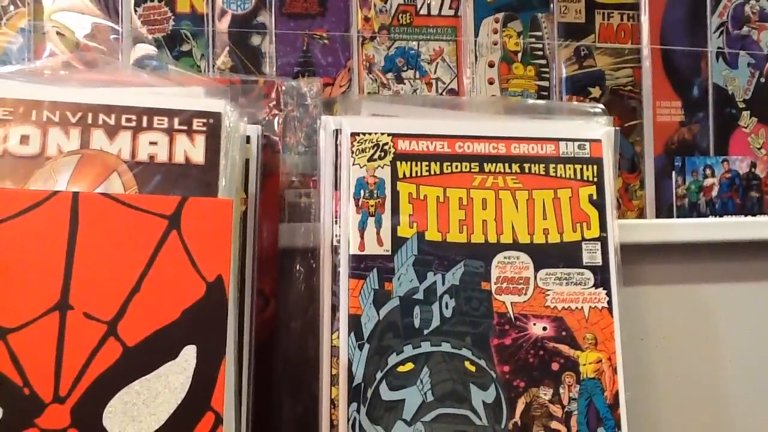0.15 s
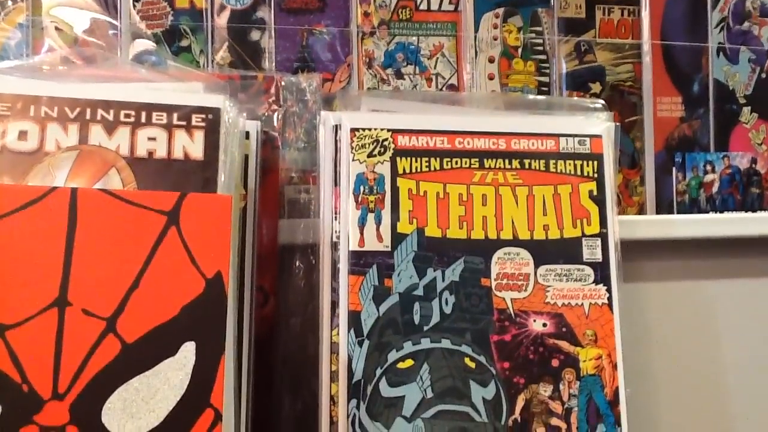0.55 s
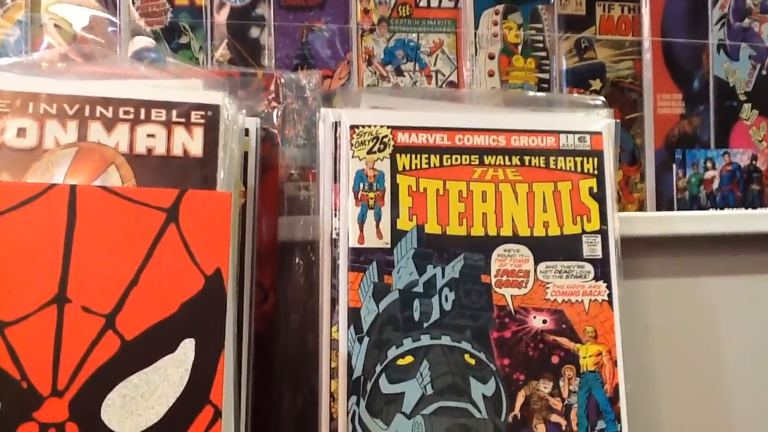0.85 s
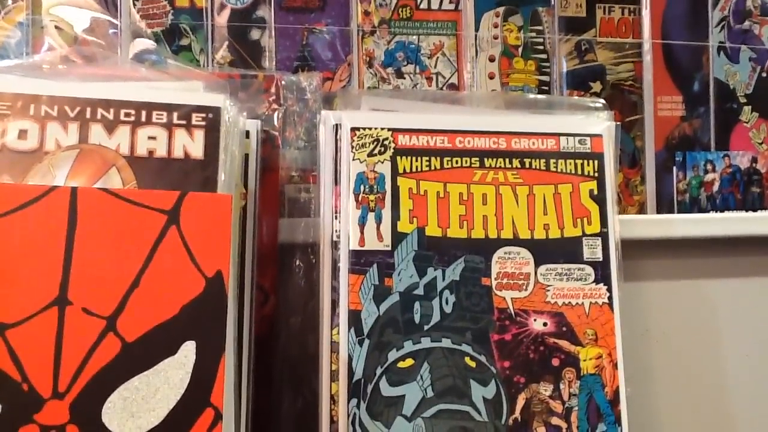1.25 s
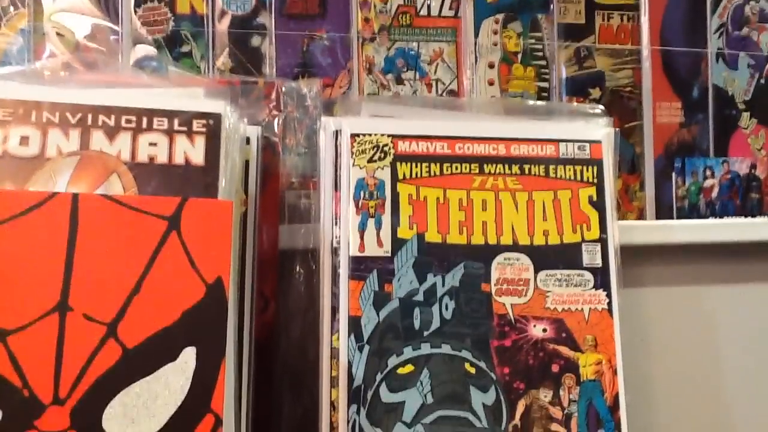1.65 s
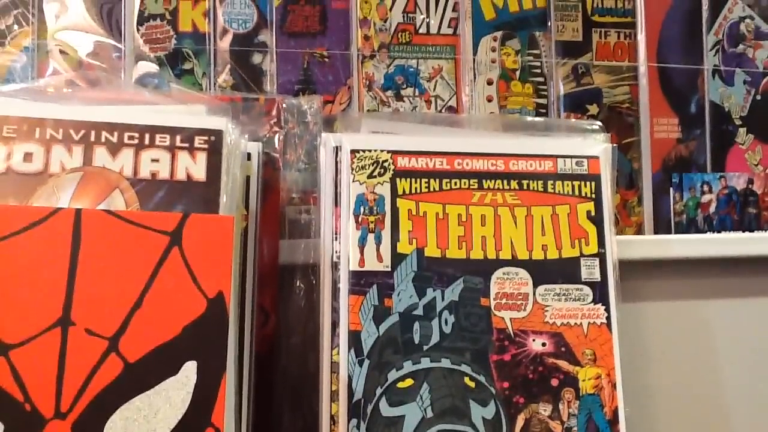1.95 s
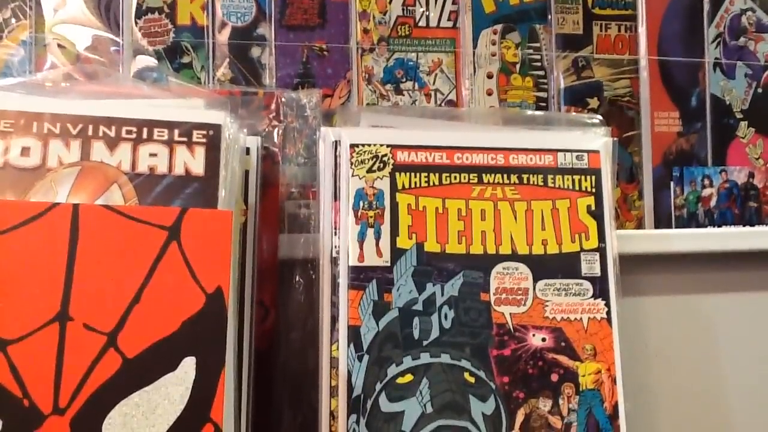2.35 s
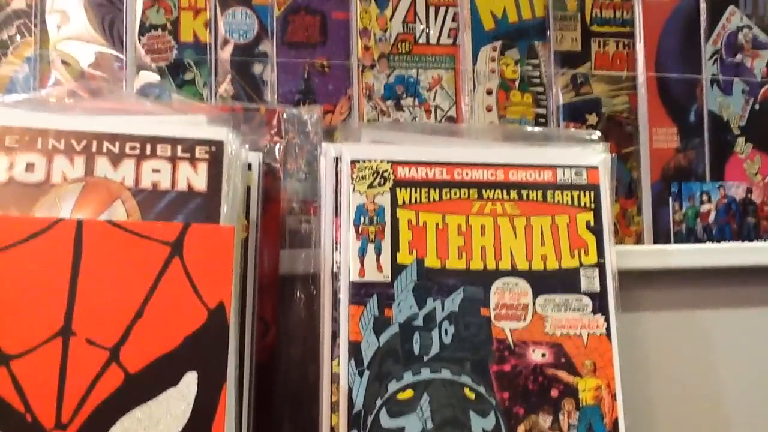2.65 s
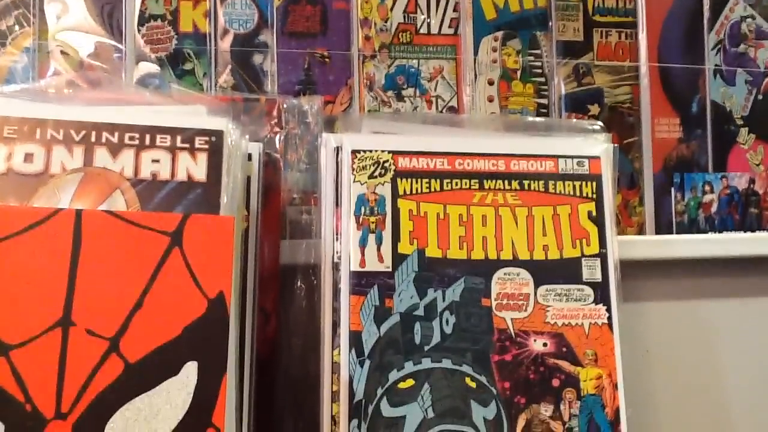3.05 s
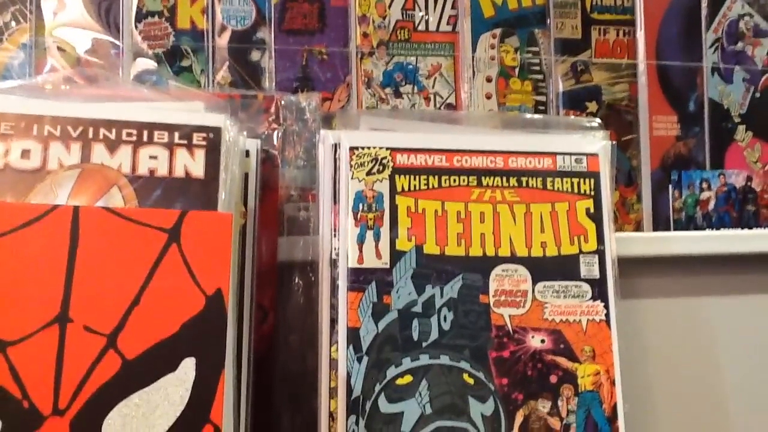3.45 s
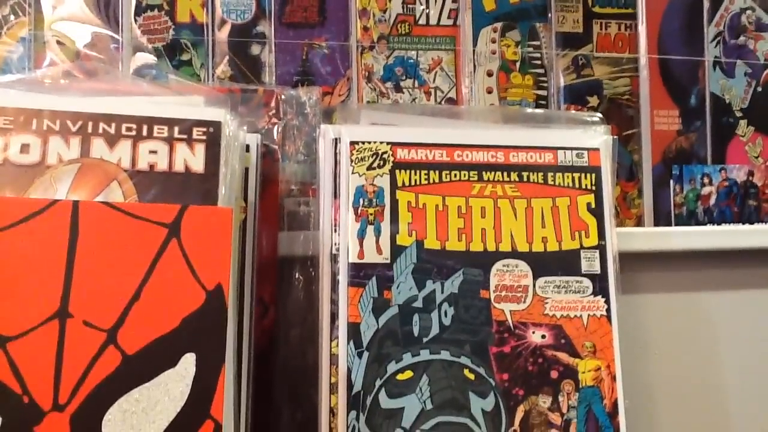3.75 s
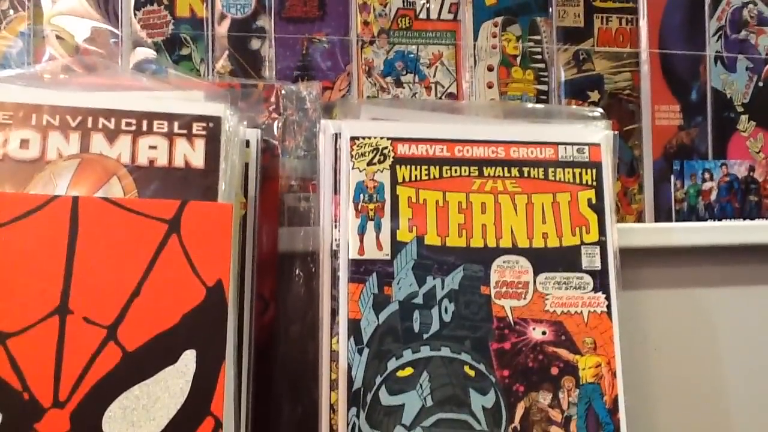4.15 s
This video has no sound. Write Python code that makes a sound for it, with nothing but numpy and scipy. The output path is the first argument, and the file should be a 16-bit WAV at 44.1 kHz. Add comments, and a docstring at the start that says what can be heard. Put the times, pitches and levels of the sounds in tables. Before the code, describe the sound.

A close, dry mono recording in a small quiet room. A faint low appliance hum, slightly wavering, and soft room hiss run throughout. Quiet rustle opens, then from about 0.25 s stiff plastic film crackles sharply. Tape lets go in bright, hard snaps near 0.55 to 0.6, 0.7 and 0.85 s, with the loudest tight cluster at 1.0 s and a low hand bump. The recording level ducks after it, hum included, and slowly recovers. Lighter crinkles follow, with a crisp burst around 1.45 s and softer swishes to 1.9 s. From 2.0 to 3.0 s there are only sparse small ticks and thin rustles, one clearer at 2.4 s. Crackling picks up from 3.05 s, with rapid little card knocks and dull scraping around 3.2 s and strong snaps near 3.3 and 3.4 s. More snaps and soft bumps come near 3.95 s, then a dense crackle at 4.15 s as a very faint low tone swells until the end.

```python
"""Peeling a taped plastic sleeve

Hands peel the taped flap of a stiff plastic sleeve close to a small microphone in a quiet room.
Buckling creases and the yielding tape snap as short noise bursts, each ringing a patch of film.
The film rustles (clumped crackles over hiss) and the card scrapes (dull noise) in swells; hands and desk
give low pushes, the card higher knocks. An appliance hums as two wavering tones over room tone, and a
faint low tone swells late. The recorder's gain control ducks after the loudest snaps and slowly recovers."""
import sys
import numpy as np
from scipy import signal
from scipy.fft import rfft, irfft
from scipy.io import wavfile
from scipy.ndimage import uniform_filter1d

SR = 44100
rng = np.random.default_rng(int(sys.argv[2]) if len(sys.argv) > 2 else 0)


def nominal_scale(level):
    """Amplitude ratio for a level in decibels (scalar or array-like)."""
    x = np.asarray(level, float) / 20
    return 10 ** x


def transcribe(u):
    """Save the signal u as a 16-bit wav file named by the first command-line argument.

    u: samples, shape (n,) or (channels, n), limited to [-1, 1]; the rate is SR.
    q: integer samples, one column per channel.
    """
    v = np.clip(np.atleast_2d(u).T, -1, 1)
    q = np.round(v * 32767).astype(np.int16)
    wavfile.write(sys.argv[1], SR, q)


N = 189100

# Creases buckling. Each row: time in seconds, nominal level of the body band over one ms in dB,
# ring frequency in Hz, bass share in dB, treble share in dB (shares relative to the body band).
CREASE_SNAPS = [(.0578, -52.5, 1840, 5, -4), (.2408, -47, 8960, -3, 5), (.2611, -25.5, 3370, -6.5, -8),
                (.2647, -29.5, 5950, -5.5, -3.5), (.3256, -41, 2670, 2, 2), (.3403, -32, 4200, -3.5, -5),
                (.3411, -30.5, 4460, -13, -7), (.3669, -40, 5460, -25, 8), (.3905, -48, 3750, -15, -16),
                (.4013, -27.5, 3480, -10, -13), (.4062, -32, 2380, -10, -4), (.408, -33.5, 5860, -4.5, -5),
                (.4691, -39.5, 10000, -24, 11), (.474, -33.5, 2470, -5.5, -3), (.489, -33, 3400, -16, -5),
                (.5344, -39, 5040, -2, -5), (.5419, -32, 4690, -24, -7), (.5605, -37, 2840, 0.5, -3),
                (.5824, -41, 4480, 1, 11), (.614, -42, 5040, -15, 16), (.659, -32.5, 2370, -5, -8),
                (.7154, -38.5, 3040, -7, -20), (.7247, -28, 6330, -2.5, 9), (.732, -34, 4520, -19, -7),
                (.7566, -35, 2540, -6, -25), (.7798, -34.5, 4240, -32, -13), (.8356, -33.5, 3730, -12, -4),
                (.8434, -37, 3230, 2, -13), (.861, -38, 9000, 2, 15), (.9666, -43.5, 2710, 1.5, -22),
                (1.0728, -47, 5600, -15.5, -4), (1.14, -31.5, 3480, -32.5, -15), (1.19, -49, 3330, -3.5, 4),
                (1.2086, -46.5, 6430, -2, -2), (1.2284, -42.5, 4970, -16, -14), (1.2663, -52, 2400, 4, -8),
                (1.364, -39.5, 3360, -2.5, -16), (1.4172, -34.5, 3860, -21, -10),
                (1.4197, -40, 5070, -15, -3), (1.429, -35, 2760, -4, 5), (1.4512, -25, 7550, -37, 3),
                (1.4577, -36, 2700, -4.5, -11), (1.4663, -27.5, 3620, -34, -23),
                (1.7889, -43.5, 2580, -15, -11), (1.8305, -45, 6460, -19, -7),
                (1.8527, -42.5, 5850, -28, -7), (1.8778, -47, 4180, -12, 0), (1.9052, -39.5, 4730, -15, 1),
                (2.0127, -50.5, 5560, -3.5, 1), (2.2082, -52.5, 2940, -12, -16),
                (2.2819, -48.5, 4780, -22, -8), (2.3031, -49.5, 4220, -16, -7),
                (2.3343, -48, 4570, -23, -6), (2.371, -44, 3550, -27, -5), (2.3726, -42.5, 4560, -21, -10),
                (2.4023, -32.5, 8040, -12, 0), (2.4045, -47, 6400, -3, -16), (2.428, -43, 4760, -19, -2),
                (2.477, -48.5, 6850, -10, 0), (2.4804, -42, 3380, -10, -7), (2.528, -45, 2800, -19, -12),
                (2.6101, -58, 4450, -20, 1), (2.6562, -50.5, 3280, -18, -5),
                (2.7377, -45.5, 5170, -11, -1.5), (2.7442, -48.5, 6850, -10, -11),
                (2.828, -48.5, 3100, -1.5, -11.5), (2.9658, -50.5, 4740, -16, -2.5),
                (3.0393, -44, 4670, -2, -10), (3.0508, -35, 6640, -27, -3.5), (3.0706, -39, 6200, -11, 1),
                (3.0983, -29, 4340, -15, -5.5), (3.1167, -38, 3830, -22, 3), (3.155, -28, 4120, -5, -1.5),
                (3.1576, -40, 7060, -6, 4), (3.1715, -40.5, 3760, -5, -20), (3.223, -48.5, 2670, 11, -2),
                (3.2539, -46, 3190, -9, 5), (3.3058, -25, 6200, -10, -3), (3.3228, -41, 5300, -9, -14),
                (3.3431, -55, 2710, 9.5, -12), (3.3691, -46, 7880, -2, 5), (3.3898, -48, 2670, -19, 3),
                (3.4105, -28.5, 2380, -8.5, -21), (3.412, -36, 6300, -13, 10),
                (3.4229, -39, 2970, -22, -19), (3.4421, -35.5, 7400, -8, 4), (3.458, -42, 7580, -1, 1.5),
                (3.4786, -32, 3800, -19, -29), (3.4843, -43.5, 4350, 0, -7),
                (3.5107, -32.5, 4540, -10.5, -9), (3.5628, -55, 1810, 6, 2), (3.661, -40.5, 4200, -8, -2),
                (3.695, -44, 2970, -3, -14), (3.7798, -39.5, 5250, -14, 1.5), (3.861, -31.5, 3100, 0.5, -8),
                (3.8669, -30.5, 7100, -30, 3), (3.9454, -44, 8700, -6, 1), (3.9628, -27, 3300, -11, 1.5),
                (3.967, -30.5, 3000, -7, -6.5), (3.998, -42, 5170, -6, 4), (4.023, -35.5, 6850, -21, 1.5),
                (4.0253, -33, 5330, -13, -2), (4.0526, -44, 5210, -18, 8.5), (4.0806, -38.5, 4660, -7, -14),
                (4.1345, -32, 6500, -11, 6.5), (4.1414, -47, 8960, -18, 12), (4.1466, -27, 5130, -17, -1.5),
                (4.1493, -27.5, 2900, -7.5, -5), (4.1543, -31.5, 5680, -1, 2), (4.1571, -35, 6120, -19, -8),
                (4.1675, -38, 7020, -16, -10), (4.1753, -34, 6030, -8, 3), (4.1795, -36.5, 2520, -8, -12),
                (4.185, -44, 4260, -8, -11), (4.2102, -39.5, 4910, -13, 0), (4.233, -40.5, 4570, -15, 1),
                (4.2394, -38, 3700, -20, -16), (4.2427, -37, 5900, -11, -2)]
# The tape letting go in jerks. Each row: the same columns as the crease snaps.
TAPE_JERKS = [(.557, -19.5, 5040, -24, -3), (.5793, -13.5, 4300, -18, -7), (.6084, -13, 5100, -17, -2),
              (.7205, -13.5, 5700, -18, 1), (.8514, -24, 8660, -9, 0), (.8535, -11, 3100, -9, 3),
              (.9962, -4, 3400, -16, -6), (.9978, -4.5, 4400, -17, -5), (1.0017, -22, 8100, -12, 4),
              (1.0032, -5, 3320, -25, -8)]
# Soft bumps and knocks: low pushes of hands and desk, higher knocks of the card. Each row:
# start in seconds, peak before the high-pass in dB, pitch in Hz, nominal t60 in seconds.
BUMPS_AND_KNOCKS = [(0.26, -35.5, 306, 0.063), (0.314, -33.5, 380, 0.0075), (0.403, -36.5, 497, 0.035),
                    (0.472, -34.5, 730, 0.0094), (0.575, -37, 256, 0.0081), (0.617, -48, 262, 0.027),
                    (0.718, -31, 580, 0.01), (0.852, -31, 350, 0.037), (0.998, -25, 383, 0.037),
                    (1.017, -23, 256, 0.074), (1.211, -32, 279, 0.058), (1.376, -40.0, 336, 0.016),
                    (1.459, -38, 221.0, 0.019), (1.805, -33.5, 245, 0.012), (1.889, -36.5, 340, 0.078),
                    (1.926, -38, 368, 0.038), (2.311, -39.5, 273, 0.019), (3.047, -48, 284, 0.039),
                    (3.154, -35, 587.0, 0.017), (3.17, -45, 905, 0.03), (3.185, -41, 1040, 0.032),
                    (3.205, -48, 950, 0.03), (3.222, -37, 1050, 0.045), (3.233, -39, 960, 0.035),
                    (3.242, -40.5, 1000, 0.026), (3.8, -40, 266, 0.0071), (3.886, -38, 390, 0.026),
                    (3.975, -40, 390, 0.042), (4.007, -30, 284, 0.024), (4.048, -31, 293, 0.018),
                    (4.073, -36, 284, 0.036), (4.104, -39.5, 323, 0.028), (4.267, -37.5, 754, 0.018)]
# Colour of the film. Each row: frequency in Hz, relative gain in dB.
FILM_COLOUR = [(1500, -6.5), (2000, -8.5), (2400, -0.5), (3600, -1.5), (5500, -1), (6800, -4), (8000, -2.5),
               (10000, -5.5), (12500, -4.5), (15000, -9.5)]
# Colour of the card. Each row: frequency in Hz, relative gain in dB.
CARD_COLOUR = [(250, -28.5), (450, 5.5), (800, -1.5), (1300, -7.5), (1900, -8), (2600, -19.5)]
# Colour of the room tone. Each row: frequency in Hz, relative density in dB.
AIR_COLOUR = [(25, -42), (60, -32.5), (100, -23), (165, -15), (210, -16), (280, -7.5), (350, -17.5),
              (410, -13), (460, -17.5), (510, -28), (1200, -37.5), (2200, -42), (4300, -41), (14800, -38.5)]
# Appliance tones. Each row: frequency in Hz, level about which the tone wavers in dB rms.
HUM_TONES = [(269.2, -48.5), (240.8, -58.5)]
# Decay off the desk and walls nearby. Each row: frequency in Hz, t60 in seconds.
TAIL_DECAY = [(500, 0.15), (1500, 0.015), (3500, 0.048), (9000, 0.076), (15000, 0.09)]
# Swell of the faint low tone. Each row: time in seconds, level in dB rms.
LOW_TONE_SWELL = [(4.13, -78), (4.2, -53), (4.29, -56.5)]
# Swells of rustling film and scraping card, from sliding fingers or the film settling after a loud
# snap. Each row: time of the peak in seconds, rustle level in dB, rise in seconds, fall in seconds,
# card share in dB (relative to the rustle).
FILM_AND_CARD_SWELLS = [(.02, -61, 0.13, 1.4, 0), (.3, -61, 0.085, 0.39, -10), (.405, -47, 0.35, 0.29, -18),
                        (.52, -50, 0.19, 0.16, -12), (.55, -48, .06, 0.073, -10),
                        (.617, -57, 0.13, 0.065, 1), (.74, -47, 0.034, 0.046, -0.5),
                        (0.855, -40.5, 0.01, 0.046, -9), (.92, -59, 0.093, 0.22, -2),
                        (1.012, -25.5, .012, 0.023, -22), (1.032, -48, 0.017, 0.059, -2),
                        (1.207, -47.5, 0.027, 0.052, -3.5), (1.358, -48, 0.11, 0.075, -9),
                        (1.459, -49.5, 0.034, 0.22, -10), (1.49, -46, .04, 0.062, -18),
                        (1.537, -49, 0.14, 0.085, -25), (1.73, -49.5, 0.054, 0.2, -14),
                        (1.84, -52.5, .03, .04, -11), (1.81, -62, 0.27, 0.29, 6),
                        (1.898, -49, 0.03, 0.045, -4.5), (2.017, -54, 0.046, 0.05, 0),
                        (2.131, -62.5, 0.12, 0.22, -16), (2.3, -63, 0.11, 0.41, -0.5),
                        (2.285, -57, 0.021, 0.032, -12), (2.342, -58, .02, 0.033, -14),
                        (2.375, -52, 0.02, 0.023, -15), (2.41, -56, .02, 0.036, -2),
                        (2.431, -53, .015, 0.018, -12), (2.476, -53, 0.013, .02, -7),
                        (2.512, -54, 0.066, .08, -11), (2.59, -53, 0.053, 0.029, -15),
                        (2.744, -57, 0.031, .05, -12), (2.891, -66.5, .6, .6, -1),
                        (3.041, -54, 0.025, 0.17, 1), (3.083, -49.5, 0.074, 0.14, -3),
                        (3.163, -56.5, 0.041, 0.071, 13), (3.19, -64, .03, 0.033, 11),
                        (3.226, -58, 0.026, 0.047, 15.5), (3.243, -50, 0.03, 0.18, -6),
                        (3.373, -47.5, 0.025, 0.058, -4), (3.418, -54.5, 0.052, 0.21, -4.5),
                        (3.49, -61.5, 0.086, 0.21, 4), (3.672, -59, 0.081, 0.55, 3),
                        (3.867, -49, 0.036, 0.038, 4.5), (4.031, -55, 0.31, 0.25, -4.5),
                        (4.177, -50, 0.042, 0.034, 0), (4.24, -56, .1, 0.1, -7),
                        (4.286, -68.5, 0.11, .1, 11)]
# How hard the film is creased while it slides. Each row: time in seconds,
# crackly share from 0 (smooth swish) to 1.
CREASE_GRIP = [(0, 0.5), (.3, 0.5), (.45, 0.64), (1.05, 0.57), (1.2, .3), (1.4, 0.36), (1.49, 0),
               (1.54, 0.44), (1.85, 0.37), (2.0, 0.24), (2.3, 0.45), (2.55, 0.2), (2.8, .55), (3.05, 0.53),
               (3.24, 0.66), (3.4, 0.55), (4.29, 0.59)]

AIR_DB = -54  # rms
WAVER_DB, WAVER_HZ = 1.1, 30  # rms and top rate of the hum's level wander
LOW_TONE_HZ = 398
TREBLE_HZ, BASS_HZ = 7000, 1800  # the film's body band lies between
SWELL_DB = 20  # span of a swell's rise and of its fall
REST_DB, CARD_REST_DB = -77.5, -71  # hands lying still
SWISH_TREBLE_DB, CRACKLE_TREBLE_DB = -16.5, 9.5  # treble share of pure swish and of pure crackle
MIDDLE_DB = -35  # snap level to which the flutter shares refer
CREASE_FLUTTER_DB, TAPE_FLUTTER_DB = -6.5, -10  # flutter relative to crack at MIDDLE_DB
SOFT_FLUTTER = 0.3  # softer snaps are more flutter than crack (dB per dB)
EDGE_HZ = 15200  # upper edge of the full band


def unit_rms(x):
    """Normalisation: the mean square becomes 1."""
    return x / np.sqrt(np.mean(x ** 2) + 1e-20)


def read(points, hz):
    """Interpolation of a (Hz, value) table on a logarithmic frequency axis."""
    f, value = np.transpose(points)
    return np.interp(np.log(hz + 1), np.log(f + 1), value)


def add(mix, s, sound):
    """Superposition: a sound is summed into the mix at second s."""
    part = mix[max(round(s * SR), 0):][:len(sound)]
    part += sound[:len(part)]


def coloured(x, points):
    """Spectral shaping: each frequency is weighted by a (Hz, dB) table."""
    gain = nominal_scale(read(points, np.fft.rfftfreq(len(x), 1 / SR)))
    return irfft(rfft(x) * gain, len(x))


def body_and_treble(x):
    """Band division: a low-pass and a high-pass part x at one crossover."""
    low = signal.butter(4, TREBLE_HZ, fs=SR, output="sos")
    high = signal.butter(4, TREBLE_HZ, "high", fs=SR, output="sos")
    return signal.sosfilt(low, x), signal.sosfilt(high, x)


def wander(top_hz):
    """Slow fluctuation: sines of random phase, weaker as they quicken, sum to rms 1."""
    t = np.arange(0, N + 64, 64) / SR
    rates = np.geomspace(top_hz / 30, top_hz, 24)
    slow = sum(np.sin(2 * np.pi * (f * t + rng.random())) / np.sqrt(f) for f in rates)
    return np.interp(np.arange(N) / SR, t, unit_rms(slow))


def causal(gain):
    """Minimum phase: the Hilbert transform of log gain lets a colour ring only after its cause."""
    log_gain = np.log(np.concatenate([gain, gain[-2:0:-1]]) + 1e-4)
    return gain * np.exp(-1j * signal.hilbert(log_gain).imag[:len(gain)])


def appliance_hum():
    """Modulated tones: the level and phase of each sine wander at random."""
    t = np.arange(N) / SR
    hum = np.zeros(N)
    for hz, db in HUM_TONES:
        level = np.sqrt(2) * nominal_scale(db + WAVER_DB * wander(WAVER_HZ))
        hum += level * np.sin(2 * np.pi * hz * t + 0.82 * wander(3.7))
    return hum


def room_tone():
    """Stationary noise: random air pressure with the spectrum of the quiet room."""
    return nominal_scale(AIR_DB) * unit_rms(coloured(rng.standard_normal(N), AIR_COLOUR))


def swells():
    """Exponential envelopes: film and card swell and die straight in dB, and powers add."""
    t = np.arange(0, N + 64, 64) / SR
    s, db, rise, fall, card_db = np.transpose(FILM_AND_CARD_SWELLS)[:, :, None]
    each = nominal_scale(db - SWELL_DB * np.maximum((s - t) / abs(rise), (t - s) / abs(fall)))
    film = np.sqrt((each ** 2).sum(0) + nominal_scale(REST_DB) ** 2)
    card = np.sqrt(((each * nominal_scale(card_db)) ** 2).sum(0) + nominal_scale(CARD_REST_DB) ** 2)
    return [np.interp(np.arange(N) / SR, t, level) for level in (film, card)]


def rustle(level):
    """Random impulses and friction: clumped crackles each ring a patch of film, over a hiss."""
    crackly = np.clip(np.interp(np.arange(N) / SR, *np.transpose(CREASE_GRIP)), 0, 1)
    treble_db = SWISH_TREBLE_DB + (CRACKLE_TREBLE_DB - SWISH_TREBLE_DB) * crackly
    clumps = nominal_scale(3.7 * wander(120.0))
    sizes = nominal_scale(4.0 * np.minimum(rng.exponential(1, N), 3.5)) * rng.standard_normal(N)
    sizes *= rng.random(N) < 3000 * clumps / SR  # 3000 crackles a second where clumps is 1
    patch = rng.integers(0, 12, N)
    t = np.arange(64) / SR
    ticks = np.zeros(N)
    for k, hz in enumerate(np.geomspace(2300, 14000, 12)):
        ring = np.cos(2 * np.pi * hz * t) * np.exp(-t * hz / 2.0)
        ticks += signal.oaconvolve(sizes * (patch == k), unit_rms(ring))[:N]
    swish = clumps ** crackly * rng.standard_normal(N)
    drive = crackly * unit_rms(ticks) + np.sqrt(1 - crackly ** 2) * swish
    body, treble = body_and_treble(coloured(drive, FILM_COLOUR))
    return level * (unit_rms(body) + nominal_scale(treble_db) * unit_rms(treble))


def scrape(level):
    """Rough contact: the card rubs and flexes in the sleeve as dull noise with random lumps."""
    lumps = (rng.random(N) < 400 / SR) * rng.exponential(1, N)  # 400 a second
    grit = rng.standard_normal(N) * (0.5 + 2.9 * lumps)
    return level * nominal_scale(1.4 * wander(60.0)) * unit_rms(coloured(grit, CARD_COLOUR))


def snaps(rows, flutter_db):
    """Impulsive buckling: a sub-millisecond burst rings one patch of film, which flutters for some ms."""
    size = 1024
    out, t, hz = np.zeros(N), np.arange(size) / SR, np.fft.rfftfreq(size, 1 / SR)
    bursts = rng.standard_normal((len(rows), 2, size))
    crack_shape = (1 - np.exp(-t / 0.00008)) * np.exp(-t / 0.00026)
    flutter_shape = (1 - np.exp(-t / 0.00018)) * np.exp(-t / 0.0031)
    flutter_shape *= np.cos(np.pi * t / t[-1] / 2)  # reaches zero at the end of the burst
    bass, treble = hz <= BASS_HZ, hz >= TREBLE_HZ
    body = (hz > BASS_HZ) & (hz < TREBLE_HZ)
    for (s, db, ring_hz, bass_db, treble_db), (crack, flutter) in zip(rows, bursts):
        softness_db = np.clip(MIDDLE_DB - db, -10, 20)
        flutter_gain = nominal_scale(flutter_db + SOFT_FLUTTER * softness_db)
        burst = rfft(unit_rms(crack * crack_shape) + flutter_gain * unit_rms(flutter * flutter_shape))
        resonance = 1 + 1.8 / (1 + ((hz - ring_hz) / (0.12 * ring_hz)) ** 2)
        gain = nominal_scale(read(FILM_COLOUR, hz)) * resonance
        for band, share_db in ((body, 0), (treble, treble_db), (bass, bass_db)):
            gain[band] *= nominal_scale(share_db) / np.linalg.norm((gain * burst)[band])
        gain *= hz ** 2 / (hz ** 2 + 400 ** 2)  # a thin film radiates no bass
        sound = irfft(burst * causal(uniform_filter1d(gain, size=9)))
        one_ms = np.sqrt(SR / 1000 * size / 2)  # turns unit spectral norm into rms 1 over one ms
        add(out, s - 0.0003, nominal_scale(db) * one_ms * sound)
    return out


def room(x):
    """Reverberation: three short noisy tails, fed in turn, each band dying at its own speed."""
    out, turn = np.zeros(N), np.arange(N) / SR * 23
    for k in range(3):
        hz, t, z = signal.stft(rng.standard_normal(8192), SR, nperseg=128)
        decay = nominal_scale(-60 * t / read(TAIL_DECAY, hz)[:, None])
        tail = signal.istft(z * decay, SR, nperseg=128)[1]
        tail *= 1 - np.exp(-(np.arange(len(tail)) / SR / 0.00023) ** 2)  # soft onset
        share = np.sqrt(2 / 3) * np.cos(np.pi * (turn + k / 3))
        out += signal.oaconvolve(x * share, tail / np.linalg.norm(tail))[:N]
    return out


def bumps_and_knocks():
    """Damped oscillation: each push or knock starts softly and dies; a light desk passes no deep bass."""
    out, t = np.zeros(N), np.arange(4000) / SR
    for s, db, hz, t60 in BUMPS_AND_KNOCKS:
        cycles = np.sin(2 * np.pi * hz * t) + 0.71 * np.sin(2 * np.pi * hz * 0.6 * t)
        push = cycles * nominal_scale(-60 * t / max(t60, 0.008)) * (1 - np.exp(-(t / 0.0025) ** 2))
        add(out, s, nominal_scale(db) * push / abs(push).max())
    return signal.sosfilt(signal.butter(2, 110, "high", fs=SR, output="sos"), out)


def low_tone():
    """Simple harmonic motion: one faint low sine swells near the end."""
    s, db = np.transpose(LOW_TONE_SWELL)
    t = np.arange(N) / SR
    level = np.sqrt(2) * nominal_scale(np.interp(t, s, db, -120))
    return level * np.sin(2 * np.pi * LOW_TONE_HZ * t)


def scene():
    """Superposition: sleeve, desk and room add as one channel of pressure."""
    background = appliance_hum() + room_tone()
    film_level, card_level = swells()
    rubbing = rustle(film_level) + scrape(card_level)
    film = snaps(CREASE_SNAPS, CREASE_FLUTTER_DB) + snaps(TAPE_JERKS, TAPE_FLUTTER_DB)
    reflected = nominal_scale(-8.5) * room(film)
    return (background + rubbing + film + reflected + bumps_and_knocks() + low_tone())[None]


def gain_control(dry):
    """Feed-forward compression: gain falls within some ms of a loud snap and recovers over seconds."""
    hop = 64
    threshold_db, slope = -31.5, 1.125  # slope in dB of ducking per dB above threshold
    fall_s, recover_s, late_s = 0.038, 1.465, 0.0061  # time constants, and a small lag
    power_db = 10 * np.log10(uniform_filter1d(dry[0] ** 2, 300)[::hop] + 1e-12)
    fall, recover = np.exp(-hop / SR / fall_s), np.exp(-hop / SR / recover_s)
    duck_db, held = np.zeros(len(power_db)), 0.0
    for k, over_db in enumerate(np.maximum(power_db - threshold_db, 0) * slope):
        if over_db > held:
            held = over_db + (held - over_db) * fall
        else:
            held *= recover
        duck_db[k] = held
    late = np.arange(len(duck_db)) * hop + late_s * SR
    return dry * nominal_scale(-np.interp(np.arange(N), late, duck_db))


def top_cut(x):
    """Nothing passes above the cut-off."""
    return signal.sosfilt(signal.butter(12, 16620, fs=SR, output="sos"), x)


def record(dry):
    """Transduction: gain control and the small capsule's bass loss; after it the band closes in steps above
    15.2 kHz."""
    ducked = gain_control(dry)
    capsule = signal.sosfilt(signal.butter(1, 120, "high", fs=SR, output="sos"), ducked)
    edge_hz = [0, EDGE_HZ, EDGE_HZ + 120, 16580, 16700, SR / 2]
    edge = signal.firwin2(1201, edge_hz, [1, 1, nominal_scale(-24), nominal_scale(-30), 0, 0], fs=SR)
    mix = signal.oaconvolve(capsule, edge[None], "same")
    return top_cut(mix)


dry = scene()
out = record(dry)
transcribe(out)
```